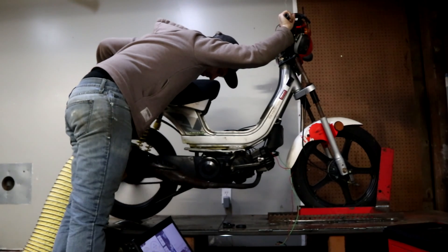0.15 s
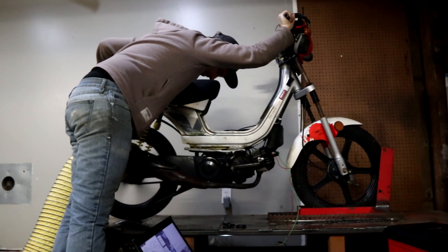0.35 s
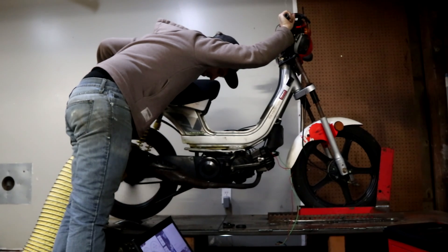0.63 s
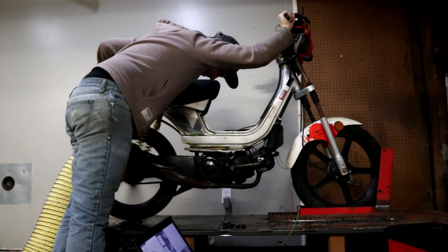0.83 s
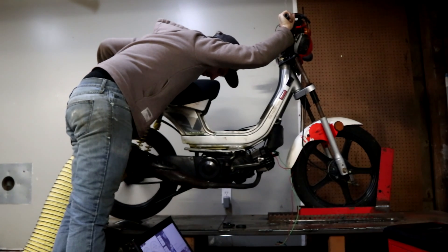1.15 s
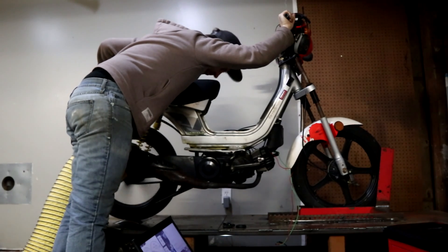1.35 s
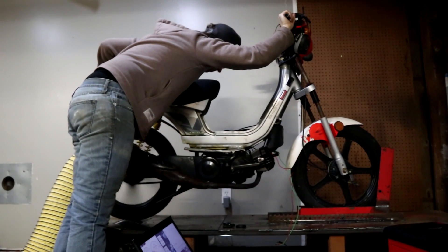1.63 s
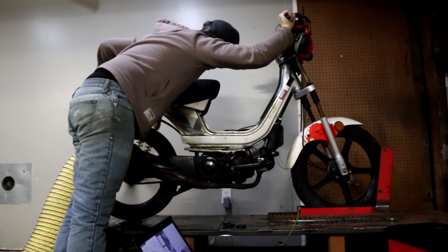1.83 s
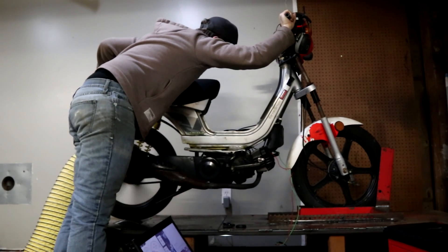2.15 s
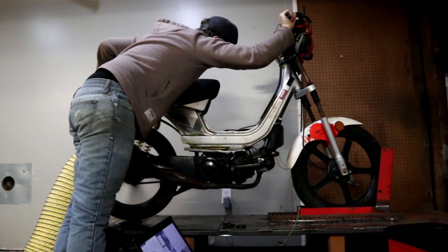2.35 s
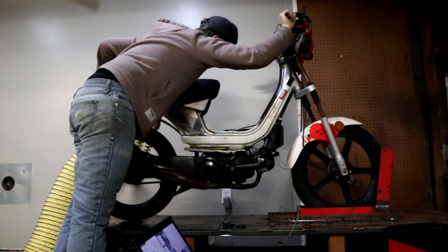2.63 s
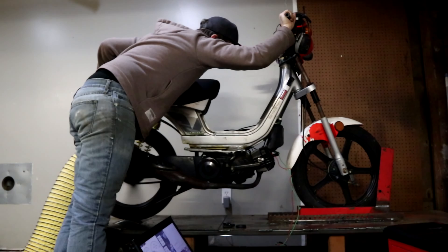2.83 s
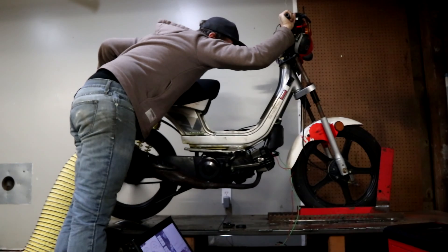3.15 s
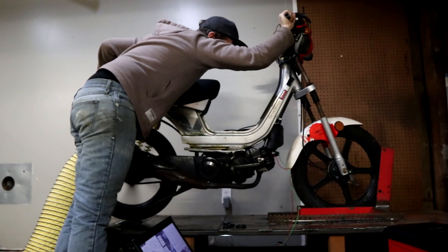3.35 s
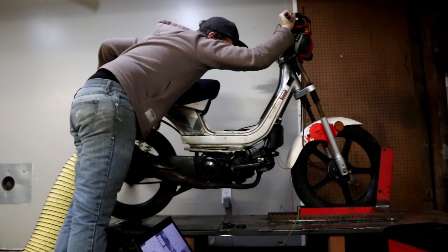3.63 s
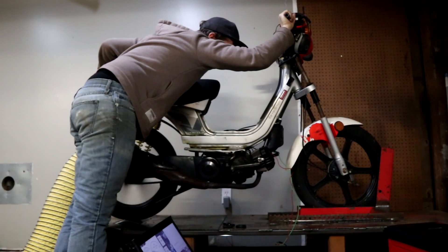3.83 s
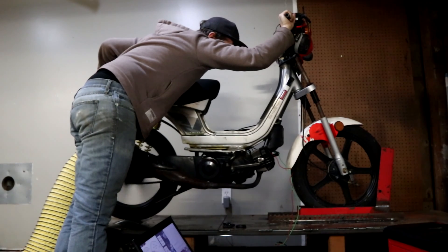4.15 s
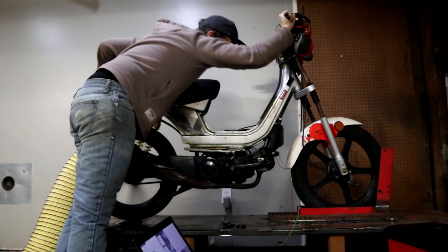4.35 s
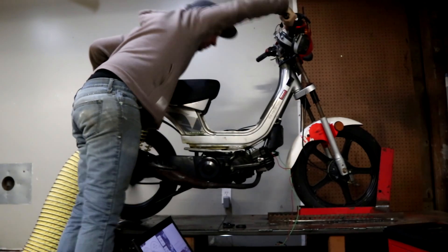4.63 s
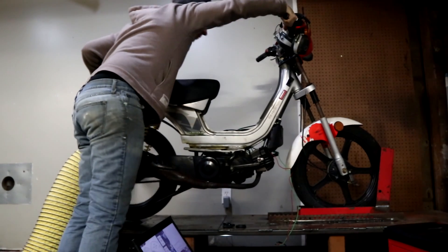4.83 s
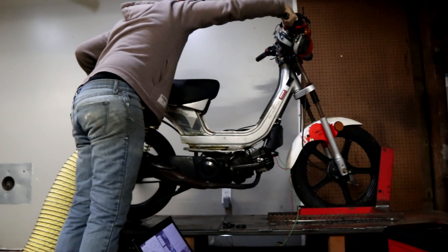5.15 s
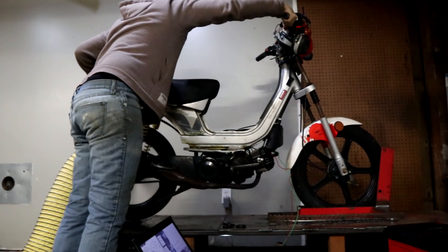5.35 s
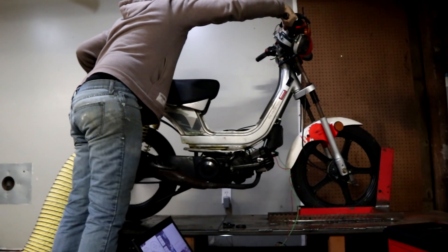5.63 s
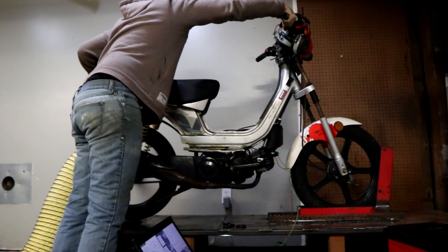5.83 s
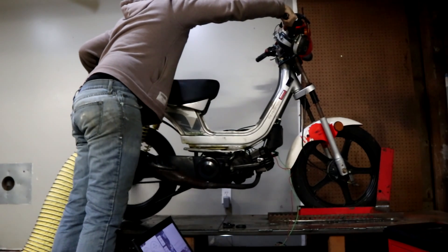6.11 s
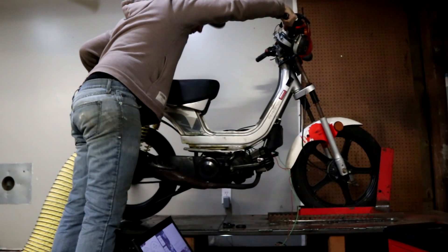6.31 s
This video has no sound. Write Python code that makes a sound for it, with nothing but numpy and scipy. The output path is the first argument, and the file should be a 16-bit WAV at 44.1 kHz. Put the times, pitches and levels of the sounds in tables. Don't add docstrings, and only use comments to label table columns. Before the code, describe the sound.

Steady, nasal moped engine drone over whirring roller and rough roar in a garage, ending in a falling, rattling coast-down with rapid exhaust pops.

```python
import sys
import numpy as np
from scipy import signal
from scipy.fft import rfft, irfft
from scipy.io import wavfile
from scipy.ndimage import uniform_filter1d

SR = 44100
rng = np.random.default_rng(int(sys.argv[2]) if len(sys.argv) > 2 else 0)


def master(y):
    cut = np.clip(np.atleast_2d(y).T, -1, 1)
    pcm = np.round(cut * 32767)
    wavfile.write(sys.argv[1], SR, pcm.astype(np.int16))


def nominal_scale(level):
    x = np.asarray(level, float) / 20
    return 10 ** x


N = 285768
SLOW = np.arange(0, N / SR + .01, .004)
SHUT_S = 4.66
# [t/s, peak level/dB, lean towards the lower ring/dB, thump level/dB]
STRAY_FIRINGS = [(4.795, -16, -6, -43), (4.923, -13, -1, -44), (5.0305, -8, 2, -40), (5.1455, -10, -9, -40),
                 (5.256, -5.5, 3, -42), (5.3782, -7, 0.5, -40), (5.4917, -9, 4, -48),
                 (5.5964, -11, -5, -38), (5.7014, -8.5, -3, -40), (5.804, -16, -3, -34),
                 (5.915, -14, -2, -28), (6.017, -8, -1, -32), (6.1219, -9, 1, -38), (6.2178, -6.5, 4, -40),
                 (6.3312, -8, 1, -42), (6.431, -7, 2, -38)]


def evened(x):
    return x / np.sqrt(np.mean(x ** 2) + 1e-20)


def read(points, hz):
    f, value = np.transpose(points)
    return np.interp(np.log(hz + 1), np.log(f + 1), value)


def bumps(modes, hz):
    return sum(db / (1 + ((hz - f) / width) ** 2) for f, width, db in modes)


def ring(x, hz, width):
    return signal.lfilter(*signal.iirpeak(hz, hz / width, SR), x)


def drift(top_hz, count):
    f = np.geomspace(top_hz / 20, top_hz, 12)[:, None]
    rows = []
    for _ in range(count):
        waves = np.sin(2 * np.pi * (f * SLOW + rng.random(f.shape)))
        rows.append(evened((waves / np.sqrt(f)).sum(0)))
    return rows


def spell(start, length):
    edge_s = .014
    return (np.tanh((SLOW - start) / edge_s) - np.tanh((SLOW - start - length) / edge_s)) / 2


def tones(t, angle, orders, levels_db, waver_db, waver_hz, gate):
    wavers = np.tanh(2.2 * np.array(drift(waver_hz, count=len(orders))))
    out = np.zeros(N)
    for k, db, waver in zip(orders, levels_db, wavers):
        gain = np.sqrt(2) * gate * nominal_scale(db + waver_db * waver * min(k / 4, 1))
        out += np.interp(t, SLOW, gain) * np.cos(k * angle + 2 * np.pi * rng.random())
    return out


def crank(t):
    # [t/s, f/Hz]
    speed_curve = [(0, 127.4), (.45, 128.5), (.85, 129.5), (1.3, 130.1), (2.1, 131.15), (2.499, 131.95),
                   (2.9, 132.2), (3.3, 133.2), (3.75, 133.3), (4.15, 133.7), (4.66, 134.1), (4.85, 129.4),
                   (5.0, 126.1), (5.2, 123.6), (5.7, 119), (6.0, 116.2), (6.48, 112.4)]
    s, hz = np.transpose(speed_curve)
    speed = uniform_filter1d(np.interp(SLOW, s, hz), 25)
    wobble = 1 + 0.00088 * drift(30, count=1)[0]
    angle = 2 * np.pi * np.cumsum(np.interp(t, SLOW, speed * wobble)) / SR
    throttle = np.exp(-np.maximum(SLOW - SHUT_S, 0) / 0.02)
    return angle, speed, throttle


def exhaust(t, angle, speed, throttle):
    # [multiple of crank speed, level/dB]
    early_orders = [(1, -4.5), (2, -13), (3, -7.5), (4, -0.5), (5, -13.5), (6, -12.5), (7, -8.5), (8, -14),
                    (9, -6.5), (10, -17), (11, -25), (12, -5.5), (13, -17), (14, 2.5), (15, 0), (16, -1),
                    (17, -2.5), (18, -0.5), (19, 2), (20, -1), (21, -9), (22, -14.5), (23, -7.5),
                    (24, -7.5), (25, -16), (26, -7.5), (27, -19), (28, -21), (29, -14), (30, -18)]
    middle_orders = [(1, -10), (2, -26.5), (3, -20.5), (4, -20.5), (5, -22), (6, -12), (7, -9.5), (8, -12),
                     (9, -14), (10, -15), (11, -12), (12, -13), (13, -18), (14, 8), (15, -5.5), (16, -4),
                     (17, -12), (18, -15), (19, -5.5), (20, -11.5), (21, -9.5), (22, -10), (23, -17),
                     (24, -16), (25, -20), (26, -21), (27, -27), (28, -16), (29, -22), (30, -20)]
    late_orders = [(1, -7), (2, -19), (3, -16.5), (4, -8.5), (5, -14), (6, -16.5), (7, -2), (8, -14),
                   (9, -6), (10, -13), (11, -12), (12, -10.5), (13, -14), (14, 5), (15, -8), (16, -3),
                   (17, -11.5), (18, -17), (19, -2.5), (20, -7), (21, -15), (22, -11), (23, -8), (24, -10),
                   (25, -10), (26, -18), (27, -24), (28, -18), (29, -17), (30, -15)]
    singing_orders = [14, 16, 7, 19, 4, 10, 12, 17]
    # [f/Hz, width/Hz, level/dB]
    fin_modes = [(4370, 110, 4), (4970, 68, 4.5), (5860, 83, 1), (7440, 250, -2), (8300, 310, 2.5)]
    # [multiple, start t/s, length/s, level/dB]
    swells = [(14, -.1, .48, -4), (14, .93, .33, 3.5), (14, 2.47, .17, -2.5), (14, 3.33, .18, -3),
              (16, -.1, .5, -5), (16, .62, .22, 3), (16, 1.3, .3, 4), (16, 2.3, .9, 2.5),
              (14, 3.55, .35, 2), (16, 3.33, .2, 4), (7, 1.84, .21, -10), (7, 2.55, .8, 4),
              (7, 4.15, .2, -8), (7, 4.54, .2, -5), (19, -.1, .51, -10), (19, 2.7, .58, -7),
              (19, 4.38, .22, 3), (10, 2.2, .52, 5), (10, 3.3, .22, 6), (10, 3.72, .38, 5),
              (10, 4.1, .6, 10), (12, -.1, .5, 4), (12, .75, .5, -7), (12, 2.45, .83, 7), (17, -.1, .53, 4),
              (17, -.1, .74, 4), (4, -.1, .5, -3), (3, .78, .45, -7), (9, 3.3, 1.5, -8), (21, .4, .8, 5)]
    # [start t/s, length/s, loss/dB]
    slips = [
        (1.26, .16, 8),
        (1.66, .155, 10),
        (2.155, .125, 8),
        (2.385, .09, 7),
        (2.65, .075, 11),
        (3.265, .06, 14),
        (4.42, .19, 3),
    ]
    levels = {}
    for (k, early_db), (_, middle_db), (_, late_db) in zip(early_orders, middle_orders, late_orders):
        balance = [early_db - 27.5, middle_db - 23, late_db - 25.5]
        levels[int(k)] = np.interp(SLOW, [.6, 2.3, 3.7], balance)
    upper = range(31, 75)
    for k in upper:
        levels[k] = -45 - .24 * (k - 30) + bumps(fin_modes, k * speed)
    for k, start, length, db in swells:
        levels[round(k)] = levels[round(k)] + db * spell(start, length)

    slip_db = sum(db * spell(start, length) for start, length, db in slips)
    for k, share in [(14, -1), (16, .4), (7, .22)]:
        levels[k] = levels[k] + share * slip_db

    plain = [k for k in levels if k not in singing_orders and k <= 30]
    out = tones(t, angle, singing_orders, [levels[k] for k in singing_orders], 1.0, 12, throttle)
    out += tones(t, angle, plain, [levels[k] for k in plain], 2.2, 6, throttle)
    return out + tones(t, angle, upper, [levels[k] for k in upper], 5.0, 3, throttle)


def pops():
    # [f/Hz, width/Hz, level/dB]
    pipe_rings = [
        (1832.4, 140, 2.5),
        (2030, 180, 8.5),
        (790, 226, -7),
        (2730, 510, -1),
        (4758, 1200, -15),
    ]
    # [delay t/s, level/dB]
    blast_returns = [
        (0, 0.5),
        (.005, -7.5),
        (0.0108, -1.5),
        (.017, -18),
        (0.026, -17),
    ]
    length = 4000
    u = np.arange(length) / SR
    out = np.zeros(N + length)
    for s, db, lean_db, thump_db in STRAY_FIRINGS:
        gas = rng.standard_normal(length)
        blast = np.zeros(length)
        for at, d in blast_returns:
            burst = gas + 12 * (abs(u - at) < 1 / SR)
            blast += nominal_scale(d) * (u >= at) * np.exp(-abs(u - at) / 0.0011) * burst
        sound = np.zeros(length)
        for k, (f, width_hz, d) in enumerate(pipe_rings):
            lean = lean_db * (-1) ** k
            sound += nominal_scale(d + lean) * ring(ring(blast, f, width_hz), f, 2 * width_hz)
        swell = np.sin(np.pi * np.minimum(u / 0.058, 1)) ** 2
        thump = nominal_scale(thump_db) * np.sin(2 * np.pi * 118 * u) * swell
        start = round(s * SR)
        out[start:start + length] += nominal_scale(db) * sound / abs(sound).max() + thump
    return out[:N]


def drive_train(t, angle, speed, throttle):
    # [multiple], then [level/dB]
    gear_ratios = [1.1, 2.17, 2.33, 2.79, 3.17, 3.82, 4.66, 5.585, 6.35, 9.29, 24.24, 25.24, 26.24]
    gear_levels = [-54, -49, -45, -48.5, -60.5, -44.5, -54, -36, -43, -42, -48, -42, -39.5]
    # [multiple, level/dB]
    pumping_orders = [(1, -38), (2, -47), (3, -43.5), (4, -42.5), (5, -43.5), (6, -45), (7, -43.5),
                      (8, -52), (14.5, -37), (22, -43)]
    # [f/Hz, width/Hz, level/dB]
    garage_modes = [(119.7, 2.1, -8), (240.5, 11.74, 12.5), (257.5, 2.2, 7), (340, 5.47, 11.5),
                    (381.6, 8, 6), (495.5, 11, 6), (581.6, 13, 11), (690, 10, 13.5), (727, 12, 13),
                    (813, 9, 13.5), (1700, 40, 4), (2720, 50, 7)]
    gears = tones(t, angle, gear_ratios, gear_levels, 3.0, 6, .35 + .65 * throttle)
    lingering_db = 6.0 * np.exp(-abs(SLOW - SHUT_S) / .12)
    multiples = [k for k, _ in pumping_orders]
    pumping_db = [db + lingering_db * (k < 5) + bumps(garage_modes, k * speed) for k, db in pumping_orders]
    return gears + tones(t, angle, multiples, pumping_db, 7.0, 40, 1 - throttle)


def roar(t, angle, throttle):
    # [f/Hz, level/dB per Hz]
    open_colour = [(18, -68), (30, -35), (75, -38), (97, -19), (123, -4), (152, -31), (192, -13.5),
                   (519, -10.5), (608, -6.5), (730, -5), (1690, -2), (1820, -1), (2250, -5), (8100, -16),
                   (15600, -37)]
    shut_colour = [(18, -61), (30, -16), (69, -57), (123, -6), (187, -20.5), (237, -6), (351, -8),
                   (432, -9.5), (711, -5), (1030, -2), (1780, -3), (2250, -6), (4930, -13.5), (8530, -19.5),
                   (15600, -43)]
    # [t/s, level/dB]
    roar_levels = [(0, -22.5), (.25, -24.5), (.68, -22.5), (.94, -27), (1.37, -24), (1.66, -25), (2.5, -24),
                   (4.75, -23.5), (5.1, -22), (5.97, -21.5), (6.12, -22.5), (6.48, -20.5)]
    # [f/Hz, width/Hz, level/dB]
    casing_modes = [(710, 33, 4), (1040, 190, 2.5), (1702.5, 40, -1), (2640, 110, 2), (3130, 150, 3),
                    (3380, 84, 1), (4430, 90, 3), (4970, 110, 3.5), (5700, 79, 0.5), (6450, 69, -2.5),
                    (6900, 71, 0), (7400, 80, 1.5), (8130, 80, -1.5), (8750, 90, 5.5), (10100, 120, 4),
                    (12800, 150, 2)]
    frames, hz = N // 256 + 5, np.fft.rfftfreq(1024, 1 / SR)
    at = np.arange(frames) * 256 / SR
    column = hz[:, None]
    opening = np.interp(at, SLOW, throttle)
    colour = read(open_colour, column) * opening + read(shut_colour, column) * (1 - opening)
    colour = colour + bumps(casing_modes, column)

    clatter_db = -.5 + .4 * (at - SHUT_S)
    colour = colour + clatter_db * (1 - opening) / (1 + ((column - 950) / 500) ** 4)

    since = at - np.transpose(STRAY_FIRINGS)[0][:, None]
    shake = np.exp(-((since - .012) / 0.0067) ** 2).sum(0)
    colour = colour + 1.8 * shake / (1 + (column / 5000) ** 2)

    a, b, patches = rng.standard_normal((frames, 513, 3)).T
    patches = evened(uniform_filter1d(uniform_filter1d(patches, 8, 0), 10, 1))
    flicker = evened(uniform_filter1d(rng.standard_normal(frames), 3))
    rattle_db = .9 + .1 * (1 - opening)
    z = (a + 1j * b) * nominal_scale(colour + rattle_db * patches + .5 * rattle_db * flicker)
    noise = signal.istft(z, nperseg=1024, noverlap=768)[1][:N]

    treble = signal.sosfilt(signal.butter(2, 1500, "high", fs=SR, output="sos"), noise)
    puffs = 0.12 * np.cos(angle) + 0.041 * np.cos(2 * angle + 1)
    top = signal.sosfilt(signal.butter(2, [3000, 9000], "band", fs=SR, output="sos"), noise)
    steady = np.sqrt(uniform_filter1d(top ** 2, 9000))
    s, level_db = np.transpose(roar_levels)
    return (noise + puffs * treble) / steady * nominal_scale(np.interp(t, s, level_db) - 2.5)


def garage(x):
    taps = np.zeros(12000)
    at = np.arange(200, 11970, 20) + rng.integers(0, 20, 589)
    taps[at] = rng.choice([-1., 1.], 589) * nominal_scale(-60 * at / SR / 0.28)
    return signal.oaconvolve(x, taps / np.linalg.norm(taps))[:N]


def scene():
    t = np.arange(N) / SR
    angle, speed, throttle = crank(t)
    bangs = pops()
    mix = exhaust(t, angle, speed, throttle) + bangs
    mix += drive_train(t, angle, speed, throttle)
    mix += roar(t, angle, throttle)
    mix += nominal_scale(-13) * garage(bangs)
    return np.tile(mix, (2, 1))


def roll_off(x):
    return signal.sosfilt(signal.butter(12, 15720, fs=SR, output="sos"), x)


def record(dry):
    # [f/Hz, level/dB]
    microphone = [(60, 1.5), (85, -10), (105, -9.5), (125, -1.5), (8000, 0.5), (8900, -1), (10000, -3),
                  (11500, 1.5), (13500, 5.5), (15500, 3.5)]
    response = nominal_scale(read(microphone, np.fft.rfftfreq(N, 1 / SR)))
    coloured = irfft(rfft(dry) * response, N)
    return roll_off(1.23 * np.tanh(coloured / 1.164))


dry = scene()
out = record(dry)
master(out)
```